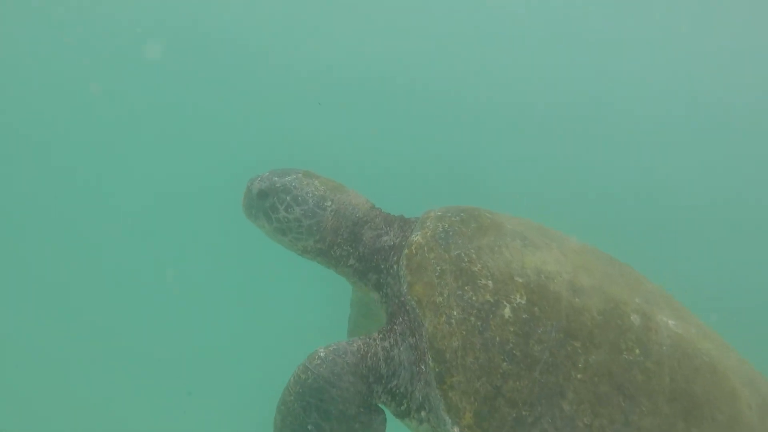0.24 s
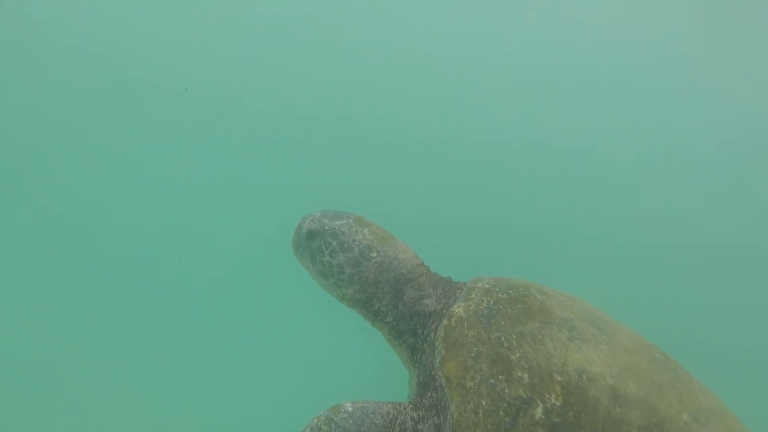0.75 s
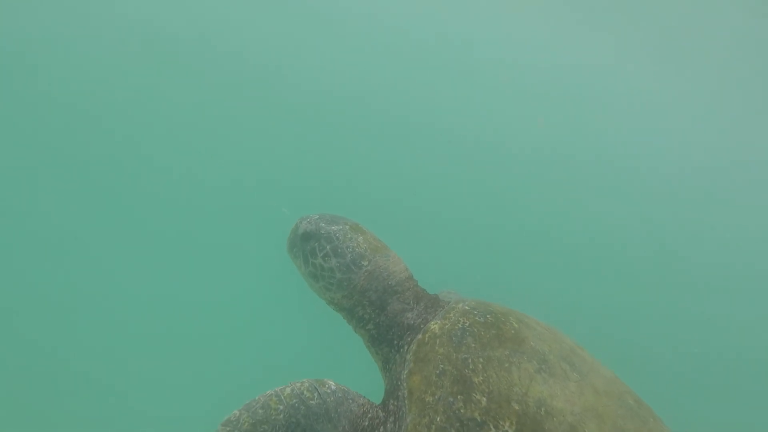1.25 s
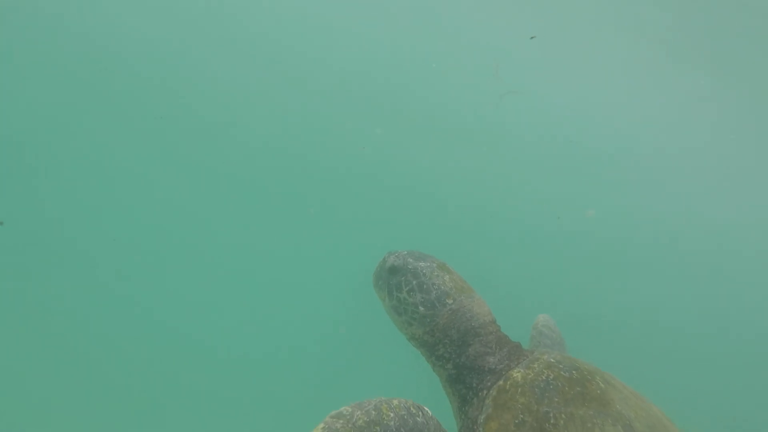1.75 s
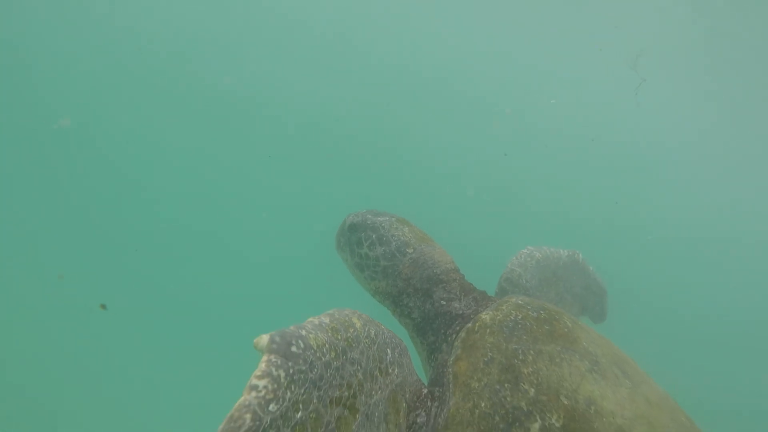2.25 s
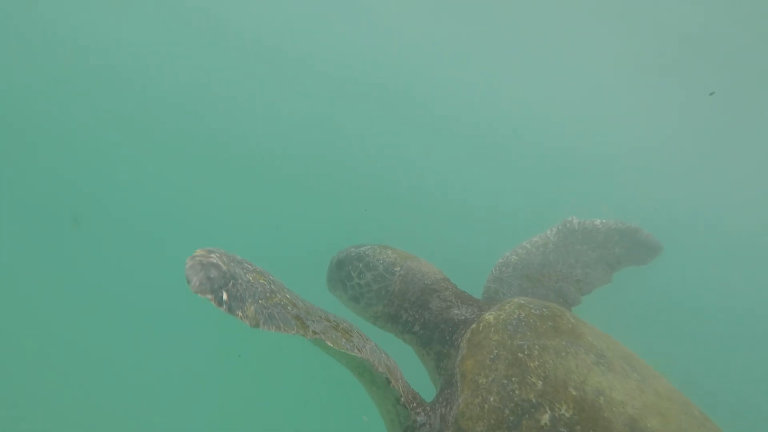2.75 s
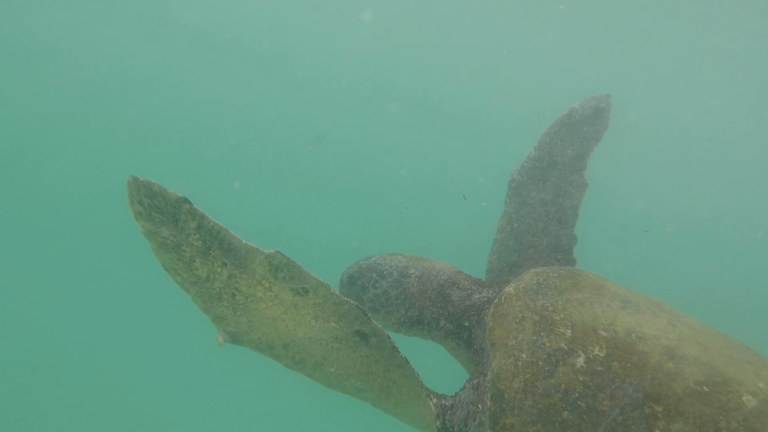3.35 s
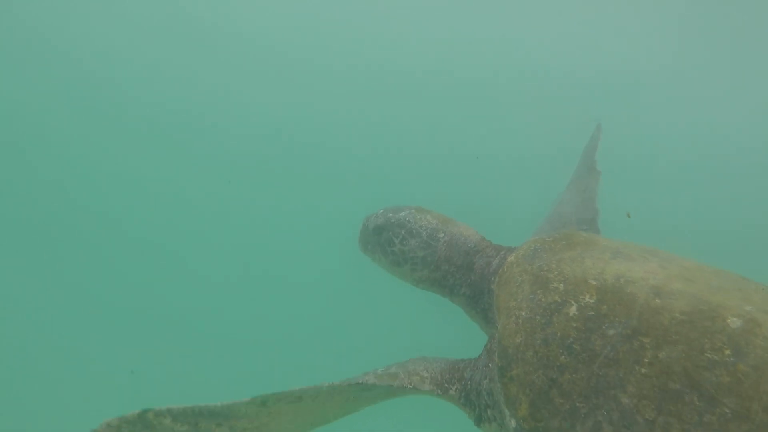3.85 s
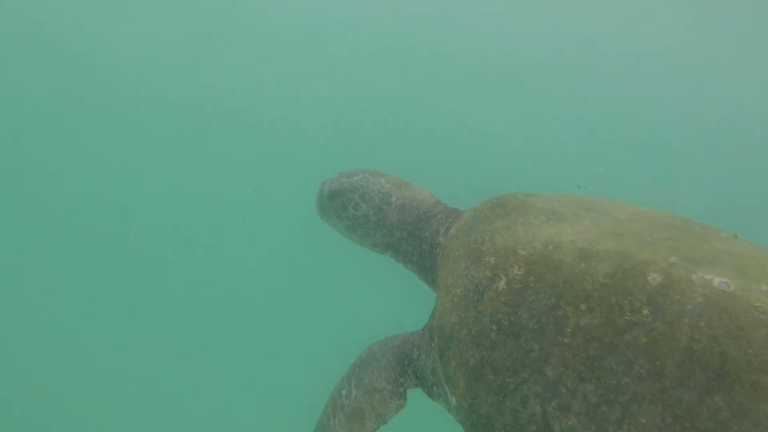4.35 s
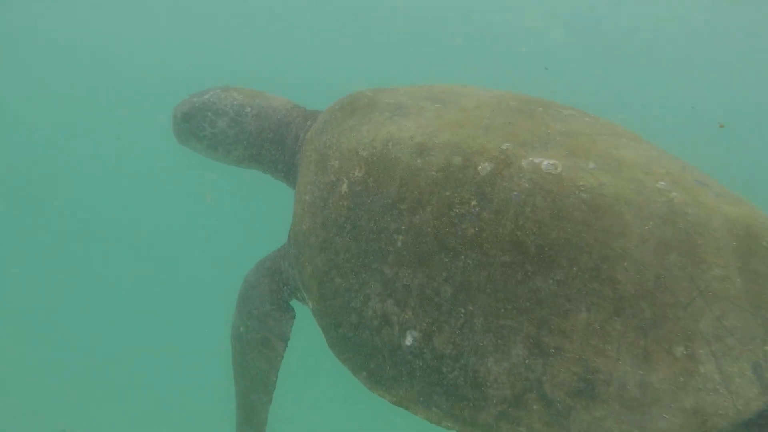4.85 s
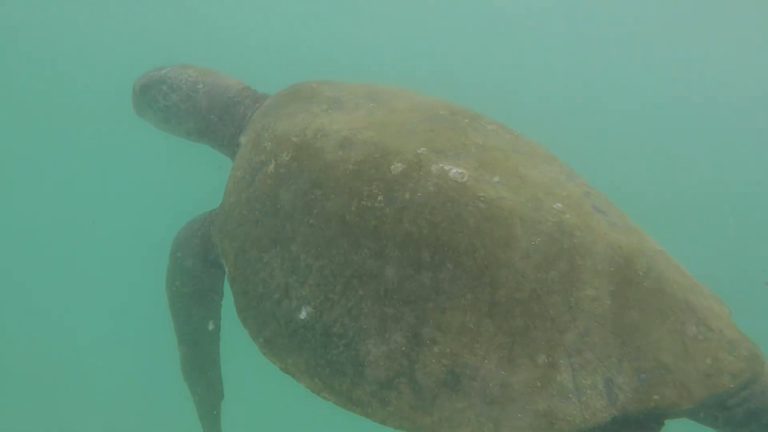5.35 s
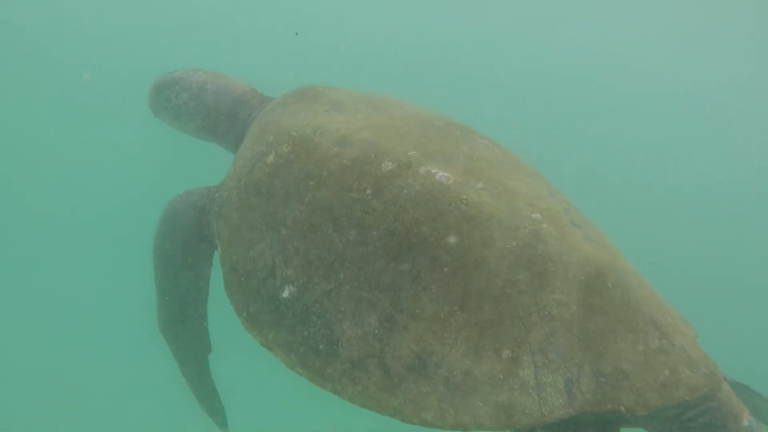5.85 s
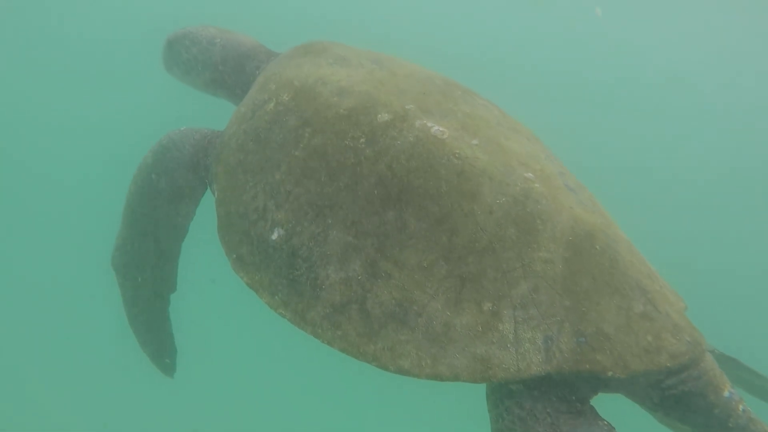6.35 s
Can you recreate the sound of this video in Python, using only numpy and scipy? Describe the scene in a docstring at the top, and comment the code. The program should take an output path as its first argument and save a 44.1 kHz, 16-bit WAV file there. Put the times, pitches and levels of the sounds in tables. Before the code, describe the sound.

Shallow sea water moves around a sealed microphone, so everything is boomy and dull. Low sloshing pulses against the wall, with thin crackling and sharp little ticks on top. Early surges and air-pocket gurgles build to a heavy thud, then the current calms with quieter gaps, scattered bumps and plops, before a final fluttering low rush.

```python
"""A waterproof case is carried through shallow sea water beside a swimming turtle, for 6.6 s.
From the start water rumbles and sloshes on the booming wall, snapping shrimp crackle and small knocks tick.
Soft bumps join at 0.6 s; the current buffets hard at 1.4 s, and the heaviest bump falls at 1.9 s.
The buffeting then eases, with surges, gurgles and bumps between, until a strong rush of water near 6.4 s.
Shaped noise makes the water, impulses through resonances the contacts and snaps, gliding tones the gurgles."""
import sys
import numpy as np
from scipy import signal
from scipy.fft import rfft, irfft
from scipy.io import wavfile
from scipy.ndimage import uniform_filter1d

SR = 44100
rng = np.random.default_rng(int(sys.argv[2]) if len(sys.argv) > 2 else 0)


def master_out(mix):
    """Clip the mix to full scale and print it as 16-bit PCM to the path in sys.argv[1]."""
    frames = np.transpose(np.atleast_2d(mix))
    ceiling = np.clip(frames, -1, 1)
    pcm = np.round(ceiling * 32767).astype(np.int16)
    wavfile.write(sys.argv[1], SR, pcm)


N = 291060

# middle resonances of the case: pitch_hz, width_hz, level_db
CASE_MIDDLE_MODES = [(700, 230, -0.5), (920, 70, 7.5), (1135, 84, 5.5), (1605, 260, 0.5), (1920, 110, -30)]
# clusters of high case resonances: centre_hz, width_hz, level_db
CASE_HIGH_CLUSTERS = [(3040, 960, -13.5), (5600, 695, 6), (7850, 1000, -13), (8940, 1540, 8.5),
                      (10200, 2000, -4), (11870, 1550, -11)]


def from_db(db):
    """Amplitude ratio of a level in decibels."""
    return 10 ** (np.asarray(db) / 20)


def rms_one(x):
    """Normalize the effective amplitude: scale to an rms of 1."""
    return x / np.sqrt(np.mean(x ** 2) + 1e-20)


def in_time(curve):
    """Linear interpolation: join (time_s, value) points by straight lines."""
    return np.interp(np.arange(N) / SR, *np.transpose(curve))


def butter(x, hz, kind, order=2):
    """Causal Butterworth low- or high-pass, flat within its pass band."""
    sos = signal.butter(order, min(hz, .45 * SR), kind, fs=SR, output="sos")
    return signal.sosfilt(sos, x)


def noise(spectrum):
    """Spectral shaping: white noise weighted by a spectrum, falling away beyond its ends; rms 1."""
    hz, db = np.transpose(spectrum)
    f = np.maximum(np.arange(N // 2 + 1) * SR / N, .5)
    low_skirt = 1 / (1 + (hz.min() / f / 2) ** 4)
    high_skirt = 1 / (1 + (f / hz.max() / 2) ** 4)
    shape = from_db(np.interp(np.log(f), np.log(hz), db))
    white = rfft(rng.standard_normal(N))
    return rms_one(irfft(white * low_skirt * high_skirt * shape, N))


def evened(x, seconds):
    """Envelope normalization: hold the running rms at 1, so that only faster flutter remains."""
    size = max(int(seconds * SR), 2)
    power = uniform_filter1d(uniform_filter1d(x ** 2, size), size)
    return x / np.sqrt(np.abs(power) + 1e-12)


def resonate(x, modes, extra_db=0):
    """Modal synthesis: parallel damped resonances of the case, each with an optional extra gain."""
    out = 0
    for (hz, width, db), extra in zip(modes, extra_db + np.zeros(len(modes))):
        r = np.exp(-np.pi * width / SR)  # a wider resonance decays faster
        poles = [1, -2 * r * np.cos(2 * np.pi * hz / SR), r * r]
        ring = signal.lfilter([1, 0, -1], poles, x + 1e-18)
        out = out + from_db(db + extra) * (1 - r * r) / 2 * ring
    return out


def high_ring(x, extra_db):
    """Modal overlap: clusters of close resonances act as steep-sided pass bands."""
    out = 0
    for (hz, width, db), extra in zip(CASE_HIGH_CLUSTERS, extra_db):
        edges = np.clip([hz - width / 2, hz + width / 2], 100, .45 * SR)
        sos = signal.butter(2, edges, "band", fs=SR, output="sos")
        out = out + from_db(db + extra) * signal.sosfilt(sos, x + 1e-18)
    return out


def grains(per_s, spread_db, cap=4.9):
    """Shot noise: random impulses of either sign, mostly small, a few large."""
    sizes = from_db(spread_db * np.minimum(rng.exponential(1, N), cap))
    signs = rng.choice([-1, 1], N)
    return sizes * signs * (rng.random(N) < per_s / SR)


def impact(scatter, t60):
    """Impulsive excitation: an impulse with a scatter of reflections that dies by 60 dB in t60 seconds."""
    t = np.arange(SR // 6) / SR
    return (t == 0) + scatter * rng.standard_normal(len(t)) * from_db(-60 * t / t60)


def snap(crack_t60, tail_db, tail_t60):
    """Multipath arrival: a claw snap comes by many paths as a dense crack and a weaker tail."""
    t = np.arange(SR // 16) / SR
    crack = from_db(-60 * t / crack_t60)
    tail = from_db(tail_db - 60 * t / tail_t60)
    return (crack + tail) * rng.standard_normal(len(t))


def add(out, s, sound, peak_db):
    """Superposition: mix a sound in at time s with the given peak level."""
    i = max(round(s * SR), 0)
    out[i:i + len(sound)] += (from_db(peak_db) * sound / np.abs(sound).max())[:N - i]


def sea(slosh_db):
    """Broadband flow noise with tiny bubbles exciting the case modes, rising very slightly with the sloshing."""
    # spectrum of the wash: frequency_hz, level_db (relative, per Hz)
    wash_spectrum = [(260, -49), (450, -3.5), (540, -7), (1750, -16.5), (3150, -28), (3640, -31),
                     (4500, -27.5), (5850, -88), (9900, -120)]
    ticks = resonate(grains(per_s=120, spread_db=2.0), CASE_MIDDLE_MODES)
    ticks = rms_one(butter(ticks, 3300, "low"))
    stir = from_db(0.022 * (slosh_db - np.mean(slosh_db)))
    return stir * (from_db(-53.5) * noise(wash_spectrum) + from_db(-65.5) * ticks)


def far_shrimp():
    """Incoherent summation: countless distant snaps, coloured by direction, over a merged fizz."""
    # spectrum of the fizz: frequency_hz, level_db (relative, per Hz)
    fizz_spectrum = [(3000, -27.5), (4700, -8), (5500, -1), (6800, -5.5), (7600, -3.5), (8800, 4.5),
                     (10500, -2.5), (13000, -9), (15000, -17)]
    crackle = 0
    for _ in range(20):  # directions
        clicks = grains(per_s=6, spread_db=4.5, cap=2.6)
        one_snap = snap(crack_t60=0.0045, tail_db=-11, tail_t60=0.046)
        snaps = signal.fftconvolve(clicks, one_snap)[:N]
        colour_db = 7.0 * rng.uniform(-1, 1, len(CASE_HIGH_CLUSTERS))
        crackle = crackle + rms_one(high_ring(snaps, colour_db))
    return from_db(-57.5) * rms_one(crackle) + from_db(-55.5) * noise(fizz_spectrum)


def bubbles(slosh_db):
    """Bubble resonance: small bubbles freed by the sloshing ping faintly, louder as it grows."""
    per_s = 8  # at each pitch
    mean_db, follows = -64.5, 0.66  # level at average sloshing; share of the sloshing's swing in dB
    pings = 0
    for hz in (604, 660, 710):
        pings = pings + resonate(grains(per_s, spread_db=6.5, cap=1.5), [(hz, 45, 0)])
    pings = rms_one(butter(pings, 940, "low", order=4))
    return from_db(mean_db + follows * (slosh_db - np.mean(slosh_db))) * pings


def gurgles():
    """Cavity oscillation: an air pocket swells into a tone and dies, its pitch gliding as it changes shape."""
    # gurgles and blips of air pockets: start_s, length_s, start_hz, end_hz, peak_db
    air_pockets = [(1.018, 0.073, 223.6, 239, -28.5), (1.099, .25, 159, 245, -25.5),
                   (1.22, 0.17, 164.4, 144.4, -28.5), (1.622, 0.042, 279, 173, -25),
                   (2.685, 0.039, 185, 161, -26), (3.34, 0.13, 169.4, 182, -32),
                   (3.402, .012, 7140, 7600, -49), (3.782, 0.034, 215, 201, -24.5),
                   (4.421, 0.0193, 675, 970, -43), (4.43, 0.026, 1074, 1195, -41.5),
                   (5.393, 0.0075, 2750, 2920, -53), (5.87, .024, 480, 350, -29),
                   (6.05, 0.1, 157, 166, -33), (6.353, 0.011, 382, 530, -32.5)]
    out = np.zeros(N)
    for s, length, start_hz, end_hz, db in air_pockets:
        age = np.linspace(0, 1, int(length * SR))
        hz = start_hz + (end_hz - start_hz) * np.sin(np.pi / 2 * age)
        swell = np.abs(np.sin(np.pi * age)) ** 0.46
        add(out, s, swell * np.sin(2 * np.pi * np.cumsum(hz) / SR), db)
    return out


def near_shrimp():
    """Selective modal excitation: each near snap rings the high resonances in its own proportions."""
    # the nearest snaps: start_s, peak_db, middle_extra_db, top_extra_db
    nearest_snaps = [(0.1935, -35, 10, 2), (0.4055, -32, -9, 17), (.5355, -22.5, 3.5, 7),
                     (.6557, -31, 1, 15), (.8837, -34, 2, 6), (0.9168, -27.5, 6, 13), (1.3844, -32.5, 5, 6),
                     (1.6001, -29.5, -20, 10), (1.6754, -34, 5, 2), (2.1817, -33.5, 15, 12),
                     (2.434, -32, 12, 7), (2.505, -34.5, 10, 3), (2.5798, -31, -20, 3), (2.7075, -33, 7, 0),
                     (2.761, -29, 6, 21), (2.8107, -35, 13, 4), (3.4792, -36.5, 24, 6),
                     (3.786, -30.5, 1, -4), (3.898, -29.5, -1, -5), (4.2188, -34, 0, 16),
                     (4.487, -30.5, 2, 6), (5.0727, -37, 3, 0), (5.6224, -36, 14, 2),
                     (6.0529, -33.5, -14, 4), (6.4174, -32.5, -14, 4)]
    strays_per_s, stray_db, stray_spread_db = 6.3, -38, 3.3  # snaps from a little further off
    stray_middle_db, stray_colour_db = -2.5, 7.5  # mean extra in the middle ring; spread of both extras
    low_db, low_follows = 8, .45  # the lowest ring goes with the middle one
    body_db = -23  # middle modes of the case under a snap
    strays = []
    for s in rng.uniform(0, N / SR, int(strays_per_s * N / SR)):
        size, middle, top = rng.standard_normal(3)
        middle_db = stray_middle_db + stray_colour_db * middle
        strays.append((s, stray_db + stray_spread_db * size, middle_db, stray_colour_db * top))
    out = np.zeros(N)
    for s, db, middle_db, top_db in list(nearest_snaps) + strays:
        colour_db = [low_db + low_follows * middle_db, middle_db, middle_db / 2 - 3, 0, 0, top_db]
        crack = snap(crack_t60=.007, tail_db=-20, tail_t60=.05)
        body = resonate(crack, CASE_MIDDLE_MODES, body_db)
        add(out, s, high_ring(crack, colour_db) + body, db)
    return out


def knocks():
    """Impact hardness: hard contacts rattle the middle modes, softer ones duller, each with a hollow ring."""
    # small plopping knocks: start_s, peak_db, ring_pitch_hz, brightness_db
    small_knocks = [(.041, -37, 860, -2), (0.535, -24, 887, 1), (0.655, -30, 844, -4),
                    (.684, -32.5, 800, -22), (0.886, -39, 890, 1), (1.593, -40, 750, -13),
                    (2.444, -22.5, 760, -16), (4.22, -36, 910, -2), (4.247, -36.5, 840, -18),
                    (5.03, -28.5, 1070, -15), (5.307, -38, 880, -11), (5.622, -35, 920, -11)]
    top_hz, dulling = 1980, 0.51  # rattle cutoff at 0 dB brightness; its shift per dB, as a level
    hollow_db = -4.5  # hollow ring against the rattle
    out = np.zeros(N)
    for s, db, hz, bright_db in small_knocks:
        upper_db = np.array([0, 0, 0, 1, 1]) * bright_db
        rattle = resonate(impact(scatter=0.078, t60=0.046), CASE_MIDDLE_MODES, upper_db)
        rattle = butter(rattle, top_hz * from_db(dulling * bright_db), "low", order=4)
        hollow = resonate(impact(scatter=0.019, t60=0.047), [(hz, 46, 0)])
        hollow = butter(hollow, 1300, "low", order=4)
        ring = rms_one(rattle) + from_db(hollow_db) * rms_one(hollow)
        add(out, s, butter(ring, 570, "high", order=4), db)
    return out


def bumps():
    """Damped wall vibration: a soft contact gives a short low ring and a dull thud that grows with its weight."""
    # soft bumps on the case: start_s, peak_db, ring_pitch_hz, upper_mode_db
    soft_bumps = [(.632, -23, 268, -10), (.772, -20, 270, -1), (1.332, -14.5, 281, -29),
                  (1.463, -21, 286, -12), (1.632, -18, 248, -25), (1.874, -5.5, 280, -5),
                  (2.062, -15, 280, -9), (2.143, -18.5, 280, -17), (2.224, -18, 286, -17),
                  (2.444, -23, 297, 6), (2.675, -21.5, 279, -20), (2.705, -21, 270, -27),
                  (3.164, -18, 278, -13), (4.124, -15.5, 299, -1), (4.677, -20.5, 231, -11),
                  (4.801, -17, 271, -23), (4.839, -19, 259, -19), (4.884, -15, 274, -6),
                  (5.233, -18, 280, -15), (5.533, -19, 208, -17), (5.616, -15, 225, -14),
                  (5.873, -24, 348, 0), (5.925, -21, 302, -25), (6.467, -9.5, 165, -18),
                  (6.489, -19, 274, -24)]
    thud_db, thud_growth = 1.5, 1  # thud mode of a full-scale bump; its change per dB of the bump's peak
    out = np.zeros(N)
    for s, db, hz, upper_db in soft_bumps:
        modes = [(110, 110, thud_db + thud_growth * db), (hz, 46, 0), (380, 90, upper_db)]
        ring = resonate(impact(scatter=0.0019, t60=0.041), modes)
        add(out, s, butter(ring, 336, "low", order=8), db)
    return out


def slosh(slosh_db):
    """Sustained modal excitation: a dense run of water slaps keeps the wall booming."""
    # low resonances of the wall: pitch_hz, width_hz, level_db
    wall_modes = [(215, 92, 7.5), (263.3, 46, 11.5), (404, 32, -3)]
    boom = resonate(grains(per_s=700, spread_db=2.0), wall_modes)
    boom = butter(boom, 398.4, "low", order=8)
    boom = butter(boom, 87, "high")
    return from_db(slosh_db) * evened(boom, seconds=0.3)


def surges():
    """Enveloped oscillation: a surge rocks the case for two or three cycles; slower ones last longer."""
    # single surges of water shoving the case: centre_s, peak_db, rocking_rate_hz
    water_shoves = [(0.839, -12, 23.3), (1.068, -8.5, 24.5), (1.156, -10.5, 61), (1.361, -11.5, 36),
                    (1.411, -9, 79), (1.52, -9, 32.4), (1.789, -13.5, 23.4), (2.351, -15, 11.5),
                    (2.65, -15.5, 32), (2.85, -12, 21.3), (2.95, -27.5, 57), (3.23, -22, 18.8),
                    (4.349, -13, 24.5), (4.599, -20, 56), (4.659, -10.5, 16), (5.11, -20.5, 48),
                    (5.219, -18, 24.5), (6.435, -9.5, 86), (6.495, -11, 72), (6.545, -12.5, 70)]
    half_length = 1.24  # cycles
    out = np.zeros(N)
    for s, db, hz in water_shoves:
        phase = rng.uniform(0, 2 * np.pi)
        cycles = (np.arange(N) / SR - s) * hz
        envelope = np.exp(-np.minimum((cycles / half_length) ** 2, 20))
        out += from_db(db) * envelope * np.sin(2 * np.pi * cycles + phase)
    return out


def rumble(current_db):
    """Turbulent pressure: the current drives slow swells and eddies, which at speed are shed as a quick flutter."""
    # spectra of slow swells and of eddies: frequency_hz, level_db (relative, per Hz)
    swell_spectrum = [(5, -18.5), (11, 2), (19, -5.5), (30, -15), (42, -24), (60, -26.5), (100, -49)]
    eddy_spectrum = [(25, 4.5), (45, 5), (76, -3), (100, -7.5), (125, -9), (230, -24.5), (400, -44),
                     (700, -62)]
    swell_db, swell_follows = -21.5, 0.33  # level at average current; share of the current's swing in dB
    eddy_db = 1  # above the current's strength
    shed_db, shed_growth = -16.5, 1.8  # level at full speed; dB per dB of current
    swell_level_db = swell_db + swell_follows * (current_db - np.mean(current_db))
    swell = from_db(swell_level_db) * evened(noise(swell_spectrum), seconds=0.39)
    eddies = from_db(current_db + eddy_db) * evened(noise(eddy_spectrum), seconds=0.048)
    shed = resonate(rng.standard_normal(N), [(63, 36, 0)])
    shed = butter(shed, 113.4, "low", order=4)
    shed_level_db = shed_db + shed_growth * (current_db - np.max(current_db))
    flutter = from_db(shed_level_db) * evened(shed, seconds=0.027)
    return swell + eddies + flutter


def scene():
    """Linear superposition: everything reaches the one microphone through the case."""
    # speed of the water past the case, as the strength of its buffeting: time_s, level_db
    current_curve = [(0, -34.5), (.5, -33.5), (.67, -45), (.82, -31.5), (1.08, -28), (1.27, -32),
                     (1.4, -20), (1.75, -30), (2.4, -36.5), (2.95, -34.5), (3.3, -38), (3.75, -40),
                     (4.35, -31), (4.9, -37.5), (5.2, -31), (5.6, -40), (6.1, -36), (6.33, -21.5),
                     (6.44, -15.5), (6.55, -17)]
    # vigour of the sloshing against the wall: time_s, level_db
    slosh_curve = [(0, -29), (.25, -32.5), (.42, -36.5), (.51, -43), (.68, -32), (.87, -36), (1.05, -28.5),
                   (1.35, -32.5), (1.53, -31.5), (1.68, -40), (1.8, -29.5), (2.0, -32), (2.38, -32),
                   (2.5, -44.5), (2.6, -44), (2.72, -42), (2.8, -38), (2.95, -38), (3.25, -34),
                   (3.55, -33.5), (3.72, -40.5), (4.0, -32), (4.45, -30.5), (4.75, -39), (4.97, -40.5),
                   (5.08, -32), (5.68, -29), (6.02, -40.5), (6.15, -30.5), (6.35, -31.5), (6.55, -25.5)]
    slosh_db = in_time(slosh_curve)
    background = sea(slosh_db) + far_shrimp() + bubbles(slosh_db) + gurgles()
    contacts = near_shrimp() + knocks() + bumps()
    water = slosh(slosh_db) + surges() + rumble(in_time(current_curve))
    return (background + contacts + water)[None]


def record(dry):
    """Soft saturation and band limiting: the largest peaks are rounded and the top is cut steeply."""
    cutoff_hz = 14900
    rounded = dry / (1 + (dry / .85) ** 6) ** (1 / 6)
    sos = signal.ellip(10, .1, 90, cutoff_hz, fs=SR, output="sos")
    return signal.sosfilt(sos, rounded)


dry = scene()
out = record(dry)
master_out(out)
```